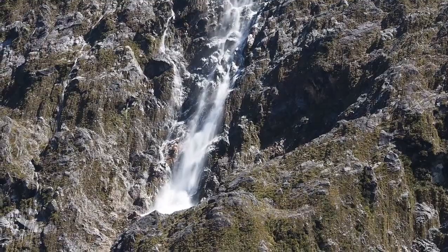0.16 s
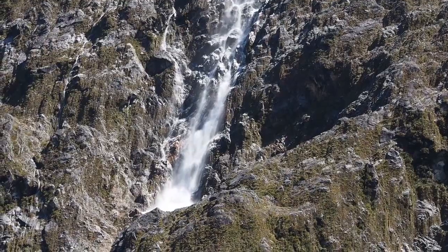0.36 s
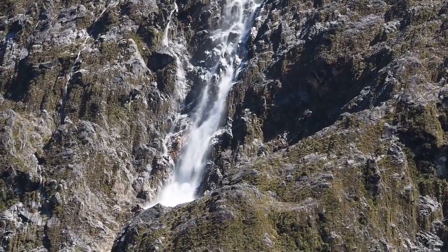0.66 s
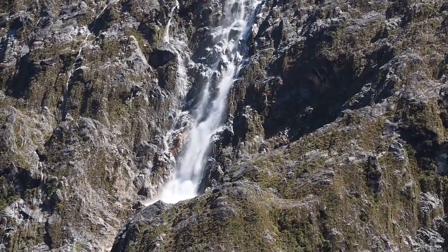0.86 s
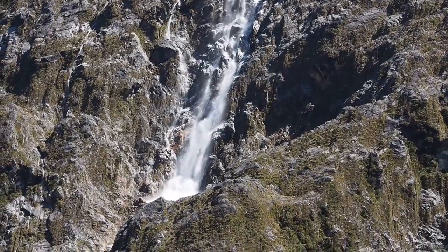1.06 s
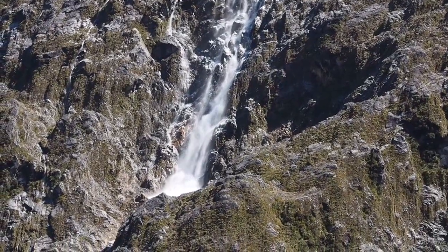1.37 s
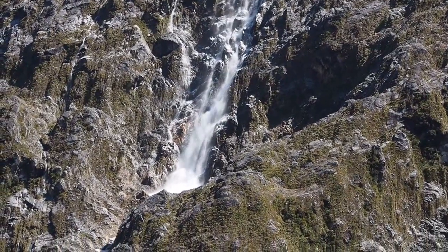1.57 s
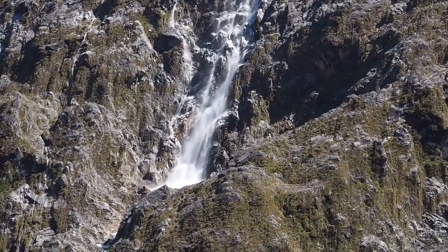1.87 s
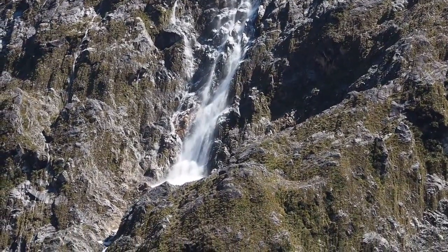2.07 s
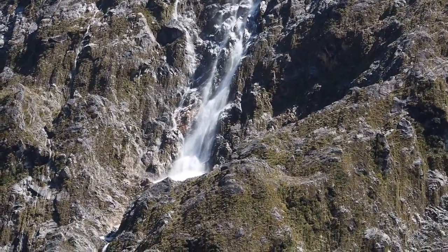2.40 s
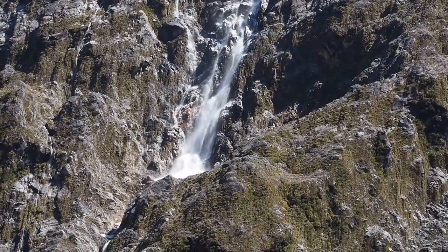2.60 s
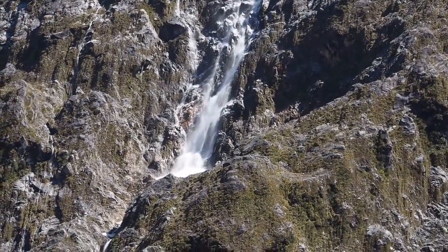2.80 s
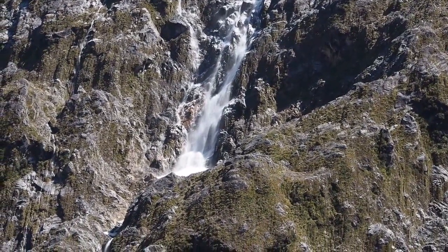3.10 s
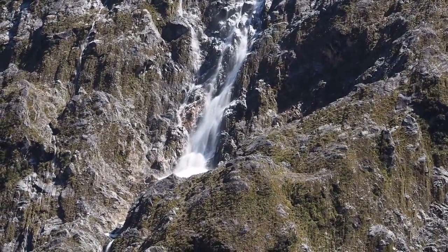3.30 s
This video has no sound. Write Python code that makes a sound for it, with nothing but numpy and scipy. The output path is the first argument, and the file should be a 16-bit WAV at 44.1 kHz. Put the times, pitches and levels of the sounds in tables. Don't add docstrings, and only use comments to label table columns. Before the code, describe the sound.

Gusty wind buffets a small stereo microphone, mainly the right side, in rough low thuds from just before one second; a distant waterfall rushes steadily beneath, with faint bright ticks from a loose part of the housing.

```python
import sys
import numpy as np
from scipy import signal
from scipy.fft import rfft, irfft, next_fast_len
from scipy.io import wavfile
from scipy.ndimage import uniform_filter1d

SR = 44100
rng = np.random.default_rng(int(sys.argv[2]) if len(sys.argv) > 2 else 0)


def store_wav(level_fs):
    pcm = np.round(np.clip(np.atleast_2d(level_fs), -1, 1) * 32767)
    wavfile.write(sys.argv[1], SR, pcm.T.astype(np.int16))


def ratio_of_db(decibels):
    return 10 ** (np.asarray(decibels, float) / 20)


N = 152145
CEILING, RELEASE_S = .185, .125


def rms_one(x):
    return x / np.sqrt(np.mean(x ** 2) + 1e-20)


def at_hz(points, hz):
    points = np.array(points)
    return np.interp(np.log(hz), np.log(points[:, 0]), points[:, 1])


def drift(rate_hz):
    r = np.exp(-80 * np.pi * rate_hz / SR)
    slow = signal.lfilter([1], [1, -2 * r, r * r], rng.standard_normal(N // 40 + 2002))[2000:]
    return np.interp(np.arange(N) / 40, np.arange(len(slow)), rms_one(slow))


def ring(clicks, hz, t60_s):
    r, w = ratio_of_db(-60 / (t60_s * SR)), 2 * np.pi * hz / SR
    return signal.lfilter([0, np.sin(w)], [1, -2 * r * np.cos(w), r * r], clicks + 1e-18)


def band(x, order, low_hz, high_hz):
    return signal.sosfilt(signal.butter(order, [low_hz, high_hz], "band", fs=SR, output="sos"), x)


def held(db):
    t = np.arange(N) / SR / RELEASE_S
    return np.exp(np.maximum.accumulate(np.log(np.maximum(db, 1e-3)) + t) - t)


def slaps():
    # start_s, level_db (over the ceiling), edge_db (crack as the limiter grips, re the swing's
    slap_events = [(.774, 10, -8.5), (1.115, 6.5, -14), (1.139, 9.5, -27), (1.153, 16, -11),
                   (1.249, 6, -43), (1.283, 11, -13), (1.334, 13.5, -32), (1.375, 19, -10),
                   (1.49, 12.5, -18), (1.576, 12, -19), (1.784, 5, -10), (1.807, 14.5, -15.5),
                   (1.859, 12.5, -30), (1.917, 12, -27), (1.967, 10, -36.5), (2.004, 12, -25),
                   (2.143, 12, -23), (2.235, -2.5, -28), (2.453, 9, -11.5), (2.638, 5.5, -14),
                   (2.679, 10, -44), (2.702, 4, -9.5), (2.715, 16, -10), (2.777, 16, -21), (2.787, 14, -33),
                   (2.831, 18, -11), (2.875, 16.5, -45), (2.94, 15.5, -16), (3.372, 6.5, -22),
                   (3.405, 8, -13.5)]
    pitch_hz, width_s = 272.5, 0.0011
    t = np.arange(N) / SR
    swing, peak_db, gap = np.zeros(N), np.zeros(N), np.ones(N)
    for k, (start_s, db, edge_db) in enumerate(slap_events):
        at = int(start_s * SR)
        height = (-1) ** k * CEILING * ratio_of_db(db)
        near = slice(at - 800, at + 800)
        d = t[near] - start_s
        bell = np.exp(-.5 * (d / width_s) ** 2)
        swing[near] += height * np.cos(2 * np.pi * pitch_hz * d) * bell
        gap[near] *= 1 - bell
        edge = np.r_[np.linspace(0, 1, 24), .55, .2, 0]
        swing[at - 24:at + 3] -= height * ratio_of_db(edge_db) * edge
        peak_db[at] = db
    surge = uniform_filter1d(ratio_of_db(held(peak_db)), size=90, origin=44)
    return swing, surge, gap


def vortices(rows, cycles):
    t, out = np.arange(N) / SR, np.zeros(N)
    for (start_s, db, hz), turn in zip(rows, rng.random(len(rows))):
        at = int(start_s * SR)
        near = slice(at - 1500, at + 1500)
        d = (t[near] - start_s) * hz
        bell = np.exp(-.5 * (d / cycles) ** 2)
        out[near] += ratio_of_db(db) * bell * np.cos(2 * np.pi * (d + turn))
    return out


def eddies(gusts, breeze, surge, lumpy_db, loose_db=0, large=0):
    # pitch_hz, level_db
    eddy_colour = [(45, -15.5), (70, -29), (110, -9), (160, 1), (230, -4.5), (320, -2.5), (430, -10),
                   (600, -29)]
    eddies_per_s, spread_db, cycles = 560, 2.8, 4.2
    gust_edge_s, brightens, port_cut_hz = 0.02, 0.34, 83
    t = np.arange(N) / SR
    level = breeze
    for start_s, length_s, db in gusts:
        inside_s = np.minimum(t - start_s, start_s + length_s - t)
        level = level + 2 * ratio_of_db(db) * np.clip(inside_s / gust_edge_s + .5, 0, 1)

    sizes = ratio_of_db(spread_db * np.minimum(rng.exponential(1, N), 3)) * rng.choice([-1, 1], N)
    bursts = sizes * (rng.random(N) < eddies_per_s / SR)
    dealt = rng.integers(0, 8, N)
    thuds = 0
    for k, (hz, db) in enumerate(eddy_colour):
        b, a = signal.butter(2, 1.3 * hz, fs=SR)
        softened = signal.lfilter(b, a, bursts * (dealt == k))
        thud = rms_one(ring(softened, hz, cycles / hz))
        brighter = surge ** (brightens * np.log2(max(hz / 230, 1)))
        thuds = thuds + ratio_of_db(db) * brighter * thud
    thuds = signal.sosfilt(signal.butter(2, port_cut_hz, "high", fs=SR, output="sos"), thuds)

    wind = level * ratio_of_db(loose_db + lumpy_db * drift(43.0)) * rms_one(thuds) + large
    pushed = wind / CEILING
    rounded = CEILING * pushed / (1 + pushed ** 4) ** (1 / 4)
    return band(rounded, 3, 45, 900)


def right_wind(swing, surge, gap):
    # start_s, length_s, level_db
    right_gusts = [(.755, 0.048, -35), (.89, 0.055, -30), (1.045, 0.17, -28), (1.185, 0.047, -34),
                   (1.23, 0.091, -35), (1.315, 0.1, -25), (1.39, 0.068, -35.5), (1.46, 0.094, -33),
                   (1.565, 0.052, -36), (1.675, 0.053, -31.5), (1.76, .28, -30), (2.055, 0.038, -30.5),
                   (2.088, 0.065, -25.5), (2.17, 0.025, -36.5), (2.2, 0.039, -35), (2.31, 0.079, -34),
                   (2.4, 0.052, -25.5), (2.47, 0.043, -37), (2.625, 0.12, -30), (2.755, 0.058, -28.5),
                   (2.815, 0.049, -28.5), (2.885, 0.037, -27.5), (2.935, 0.04, -40), (3.115, 0.06, -29.5),
                   (3.335, 0.12, -34)]
    # start_s, level_db (peak), pitch_hz
    thud_events = [(0.774, -18, 232), (1.051, -21.8, 142), (1.073, -19.5, 114), (1.076, -14.5, 234),
                   (1.103, -16.8, 264), (1.115, -17, 262), (1.134, -15, 229), (1.14, -17, 343),
                   (1.148, -22, 420), (1.154, -20.5, 203), (1.193, -22.5, 159), (1.208, -15, 200),
                   (1.241, -19, 240), (1.247, -17, 125), (1.281, -15.5, 170), (1.328, -16, 186),
                   (1.341, -14.5, 267), (1.355, -21, 190), (1.361, -14, 338), (1.377, -20.5, 343),
                   (1.49, -20, 201), (1.518, -17.5, 175), (1.578, -13.5, 153.5), (1.692, -29, 114),
                   (1.769, -16.5, 287), (1.777, -16, 110), (1.781, -16, 346), (1.79, -17, 343),
                   (1.811, -24, 153), (1.858, -15, 239), (1.887, -17.5, 198), (1.909, -27, 172),
                   (1.941, -15, 267), (1.97, -9.5, 270), (1.996, -12.5, 243), (2.022, -25.5, 175),
                   (2.067, -29, 134), (2.075, -17.9, 298), (2.111, -21.4, 155), (2.127, -15, 304),
                   (2.235, -17.5, 188), (2.354, -18, 185), (2.421, -18.9, 207), (2.45, -15, 224),
                   (2.641, -14, 180), (2.668, -24, 229), (2.68, -11, 283), (2.702, -19, 321),
                   (2.716, -11.5, 307), (2.858, -21, 255), (2.9, -17, 166), (2.944, -24, 202),
                   (3.137, -19, 214), (3.151, -19.5, 124), (3.341, -16.5, 264), (3.351, -18.5, 183),
                   (3.373, -16, 156), (3.377, -17.5, 227), (3.4, -16.5, 286), (3.402, -25.5, 127)]
    # start_s, level_db (peak), pitch_hz
    flutter_events = [(0.774, -31, 386), (1.114, -18.5, 456), (1.142, -40, 475), (1.15, -13.5, 613),
                      (1.282, -25.9, 416), (1.336, -15, 480), (1.38, -20.5, 507), (1.42, -19.5, 415),
                      (1.521, -25, 471), (1.772, -24, 433), (1.81, -26, 417), (1.834, -24.1, 404),
                      (1.853, -24, 413), (1.856, -17, 700), (1.863, -25, 412), (1.884, -20.5, 405),
                      (1.963, -38, 400), (1.978, -31, 392), (2.065, -24.5, 410), (2.115, -23, 460),
                      (2.144, -29, 413), (2.42, -31.5, 420), (2.656, -22, 397), (2.68, -21, 413),
                      (2.739, -23.5, 400), (2.776, -20.5, 540), (2.777, -24.0, 408), (2.787, -27, 490),
                      (2.828, -29, 456), (2.907, -21.5, 480)]
    breeze_db, breeze_from_s, breeze_rise_s = -31.5, 0.92, 0.19
    rise = np.clip((np.arange(N) / SR - breeze_from_s) / breeze_rise_s, .15, 1)
    large = vortices(thud_events, cycles=1.11) + vortices(flutter_events, cycles=2)
    breeze = ratio_of_db(breeze_db) * rise
    wind = eddies(right_gusts, breeze, surge, lumpy_db=0.19, loose_db=-4, large=large)
    return wind * surge * gap + swing


def left_wind(surge):
    # start_s, length_s, level_db
    left_gusts = [
        (.745, 0.032, -35.5),
        (.82, 0.14, -46),
        (1.0, 0.14, -50),
        (2.28, 0.16, -49),
        (2.41, 0.039, -40),
        (2.44, 0.035, -45),
        (2.47, 0.041, -48.5),
        (3.4, 0.059, -55),
    ]
    breeze_db = -52
    return eddies(left_gusts, ratio_of_db(breeze_db), np.ones(N), lumpy_db=-1.0) * surge ** 1.65


def sway():
    noise = band(rng.standard_normal(N), 2, 25, 79)
    return ratio_of_db(-61 + 1.6 * drift(5.2)) * rms_one(noise)


def ticks():
    # start_s, level_db (peak), pitch_hz
    tick_events = [(.154, -53, 7300), (.209, -43, 6100), (.281, -52, 7700), (.409, -51, 6100),
                   (.483, -45, 6100), (.639, -49, 8900), (.683, -51, 9800), (.933, -45, 5900),
                   (.967, -50, 10700), (1.21, -47, 6100), (1.632, -55, 8600), (1.886, -52, 6000),
                   (2.087, -49, 7500), (2.24, -53, 8400), (2.855, -48, 8300), (3.319, -54, 7100),
                   (3.36, -47, 7600)]
    t60_s, pan_db = .006, -1.5
    small_per_s, small_db = 60, -63
    out = np.zeros(N)
    for start_s, db, hz in tick_events:
        click = np.zeros(N)
        click[int(start_s * SR)] = ratio_of_db(db + 2.0)
        upper_hz = 1.42 * hz if hz < 7000 else 1.2 * hz
        out += ring(click, hz, t60_s) + .7 * ring(click, upper_hz, t60_s)

    sizes = ratio_of_db(small_db + 3 * np.minimum(rng.exponential(1, N), 3))
    small = sizes * (rng.random(N) < small_per_s / SR)
    dealt = rng.integers(0, 6, N)
    for k, hz in enumerate([4530, 5900, 6660, 7500, 8700, 10500]):
        out += ring(small * (dealt == k), hz, t60_s)
    return band(out, 2, 5000, 11000) * ratio_of_db([[pan_db], [-pan_db]])


def waterfall(patchy_db):
    # pitch_hz, level_db (per Hz)
    fall_body = [(24, -44.5), (40, -18.5), (200, -2), (264, 2.5), (303, -4), (447, -2.5), (542, -4),
                 (1100, -4), (1430, -34), (2420, -120)]
    # pitch_hz, level_db (per Hz)
    fall_top = [(1250, -11.5), (1500, -12), (2000, -20.5), (2800, -31)]
    # pitch_hz, level_db (per Hz)
    fall_air = [(3600, -38.5), (4600, -40.5), (5400, -41), (6100, -41), (7500, -41), (8800, -42),
                (10500, -49), (15500, -57)]
    # start_s, level_db
    carried = [(0, 0.1), (.75, -0.2), (.85, 0.5), (1.049, 2.2), (1.5, -1.9), (1.75, 0.55), (2.1, 0.2),
               (2.4, 1), (2.6, 0.8), (3.0, -0.8), (3.3, 1.5), (3.45, 2.1)]
    # pitch_hz, likeness (-1 to 1)
    likeness = [(60, -1), (100, 1), (200, 0.45), (800, 0.95), (1200, 0.7), (1800, 0.52), (2600, -0.01),
                (5000, -0.29)]
    # pitch_hz, level_db
    port_lean = [(60, -2.5), (140, -1.5), (210, 1.5), (1130, 2.5), (1700, 1), (2600, -3), (5500, .5),
                 (9000, -3)]
    fall_db = -35
    size = next_fast_len(N)
    hz = np.maximum(np.arange(size // 2 + 1) * SR / size, 1)
    mid, side = rfft(rng.standard_normal((2, size)))
    alike = np.clip(at_hz(likeness, hz), -1, 1)
    lean_db = at_hz(port_lean, hz) / 2
    colour = ratio_of_db(at_hz(list(fall_body)[:-2] + list(fall_top) + list(fall_air), hz))
    stereo = np.sqrt(1 + alike) * mid + np.sqrt(1 - alike) * side * [[1], [-1]]
    both = colour * ratio_of_db([lean_db, -lean_db]) * stereo

    out, together = 0, drift(3.0)
    for octave in np.arange(4, 15, .5):
        window = np.clip(1 - 2 * abs(np.log2(hz) - octave), 0, 1)
        flicker = ratio_of_db(patchy_db * (.6 * together + drift(14.0)))
        out = out + irfft(both * window, size)[:, :N] * flicker
    level = ratio_of_db(fall_db + np.interp(np.arange(N) / SR, *np.transpose(carried)))
    return level * out / np.sqrt(np.mean(out.mean(axis=0) ** 2))


def scene():
    swing, surge, gap = slaps()
    wind = np.array([left_wind(surge), right_wind(swing, surge, gap)])
    return wind + sway() * surge ** 0.3 + ticks() + waterfall(patchy_db=1.43)


def roll_off(x):
    return signal.sosfilt(signal.butter(12, 15750, fs=SR, output="sos"), x)


def record(dry):
    attack_s = .00025
    over_db = 20 * np.log10(abs(dry).max(axis=0) / CEILING + 1e-9)
    r = np.exp(-1 / (attack_s * SR))
    cut_db = signal.lfilter([1 - r], [1, -r], held(over_db))
    top = 1.1 * CEILING
    x = dry * ratio_of_db(-cut_db) / top
    return roll_off(top * x / (1 + x ** 6) ** (1 / 6))


dry = scene()
out = record(dry)
store_wav(out)
```